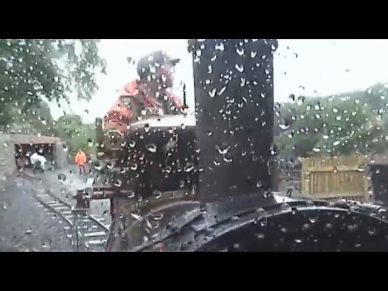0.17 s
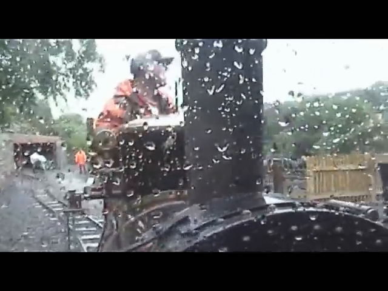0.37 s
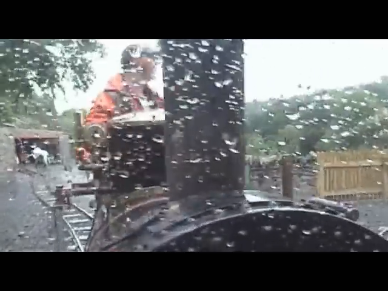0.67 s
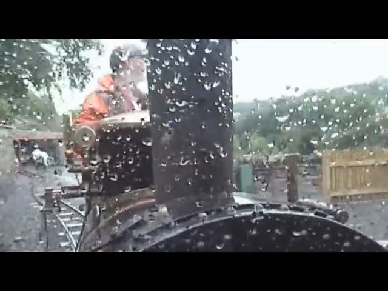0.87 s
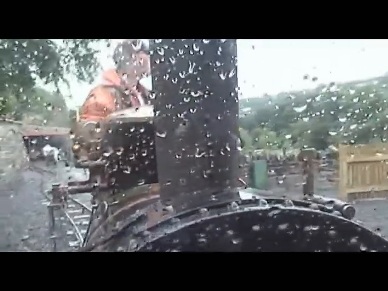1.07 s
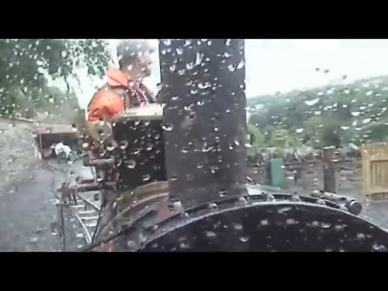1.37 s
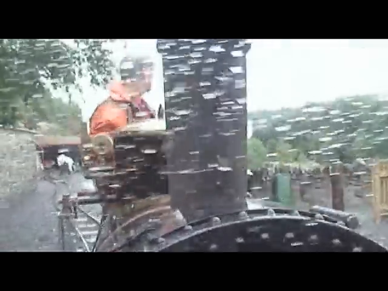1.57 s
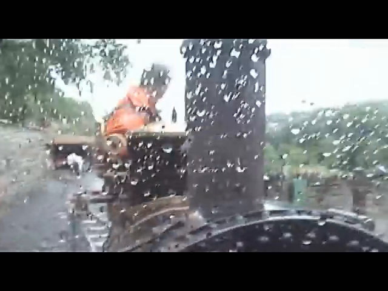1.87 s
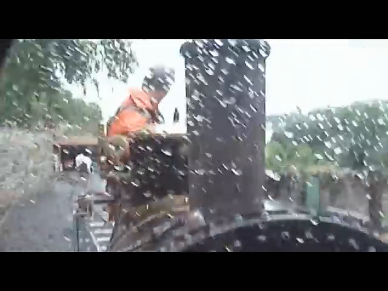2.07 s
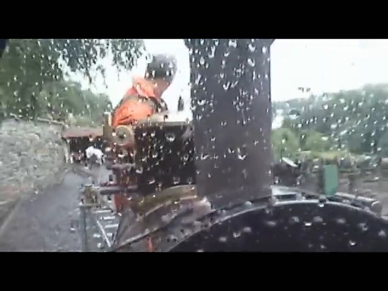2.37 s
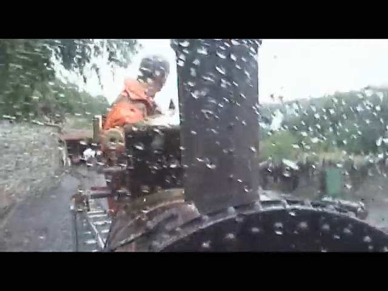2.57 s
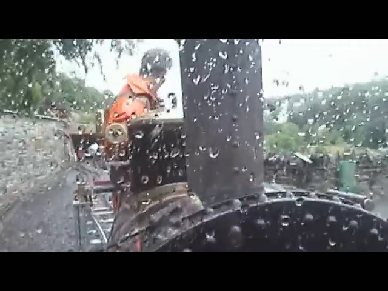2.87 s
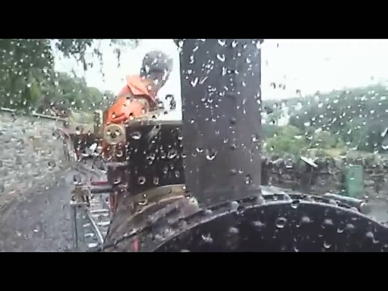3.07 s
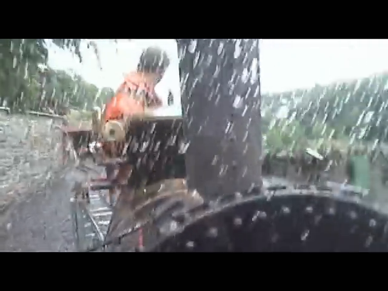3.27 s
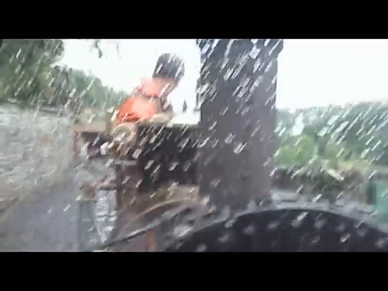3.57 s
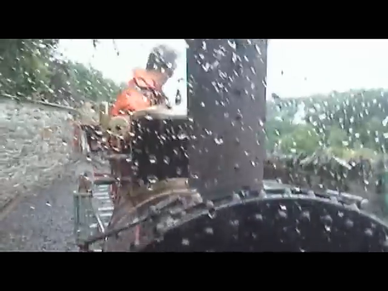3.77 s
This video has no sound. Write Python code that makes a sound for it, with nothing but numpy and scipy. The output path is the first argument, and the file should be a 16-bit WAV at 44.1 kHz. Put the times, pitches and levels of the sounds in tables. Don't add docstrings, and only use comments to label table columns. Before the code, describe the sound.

Low locomotive rumble runs throughout, with dull iron knocks and bright rod clanks in uneven clusters, a buffer slam near the end, and very faint hiss behind. Heard close from the coupled wagon in a walled yard.

```python
import sys
import numpy as np
from scipy import signal
from scipy.fft import rfft, irfft, next_fast_len
from scipy.io import wavfile
from scipy.ndimage import uniform_filter1d

SR = 44100
rng = np.random.default_rng(int(sys.argv[2]) if len(sys.argv) > 2 else 0)


def put_to_file(sound):
    columns = np.atleast_2d(sound).T
    safe = np.clip(columns, -1, 1)
    whole_steps = np.round(safe * 32767)
    wavfile.write(sys.argv[1], SR, whole_steps.astype(np.int16))


def level_to_linear(level):
    exponent = np.asarray(level, float) / 20
    return 10 ** exponent


N = 172431


def evened(x):
    return x / np.sqrt(np.mean(x ** 2) + 1e-20)


def curve(table, axis):
    rows = np.array(table)
    return np.interp(np.arange(N) / SR, rows[:, 0], rows[:, axis])


def add(mix, start_s, sound):
    at = round(start_s * SR)
    part = mix[max(at, 0):][:len(sound) + min(at, 0)]
    part += sound[max(-at, 0):][:len(part)]


def colour(x, spectrum, tilt_db=0.):
    size = next_fast_len(len(x) + 4096)
    hz = np.fft.rfftfreq(size, 1 / SR)
    table_hz, table_db = np.transpose(spectrum)
    db = np.interp(np.log(hz + 1), np.log(table_hz + 1), table_db)
    db += tilt_db * np.log2(hz / 1000 + 1e-3)
    low_cut = np.minimum(hz / spectrum[0][0], 1) ** 4
    return irfft(rfft(x, size) * level_to_linear(db) * low_cut, size)[:len(x)]


def ring(x, hz, width_hz):
    r = np.exp(-np.pi * width_hz / SR)
    poles = [1, -2 * r * np.cos(2 * np.pi * hz / SR), r * r]
    return signal.lfilter([(1 - r * r) / 2, 0, (r * r - 1) / 2], poles, x)


def lumps(size):
    smooth = uniform_filter1d(rng.standard_normal(N), size)
    return evened(uniform_filter1d(smooth, size))


# (time [s], low sway level [dB], rolling level [dB])
WHEEL_EFFORT = [(0, -36, -40), (.35, -37.5, -36.5), (.8, -42, -34), (1.25, -41, -31), (1.6, -35, -29.5),
                (1.85, -31.5, -34.5), (2.1, -32.5, -30.5), (2.35, -36.5, -34), (2.7, -33.5, -35),
                (3.0, -42, -32), (3.3, -32, -29.5), (3.5, -34, -33.5), (3.75, -32, -40), (3.91, -36, -30)]
SWAY_MEAN_DB, ROLL_MEAN_DB = -39, -35
# (frequency [Hz], width [Hz], level [dB])
FRAME_MODES = [(34.4, 12, -47.5), (52.15, 10.7, -41.5), (97, 7.6, -41.5), (132.3, 23, -41),
               (164, 16.7, -39.5), (190, 11.2, -41.5), (220.5, 35.3, -44), (262.7, 19.7, -43),
               (316.3, 17.6, -46.5), (350, 33.5, -51), (473.7, 48, -55.5), (566.3, 25, -58.5),
               (714.5, 17, -63), (980, 18, -75)]


def frame():
    sway_db = curve(WHEEL_EFFORT, axis=1) - SWAY_MEAN_DB
    roll_db = 0.92 * (curve(WHEEL_EFFORT, axis=2) - ROLL_MEAN_DB)
    out = np.zeros(N)
    for hz, width_hz, db in FRAME_MODES:
        driven = ring(rng.standard_normal(N), hz, width_hz)
        mode = evened(ring(driven, hz, 3 * width_hz))
        effort_db = sway_db if hz < 70 else roll_db * min(hz / 200, 1) ** 2
        out += mode * level_to_linear(db + effort_db)
    return out


# (peak time [s], level [dB], frequency [Hz], half length [s])
JOINT_BOOMS = [(.03, -28.5, 164, 0.088), (.25, -27, 162.8, 0.057), (.65, -30.5, 164, 0.15),
               (0.925, -40, 97, 0.027), (1.02, -27.5, 164, 0.078), (1.19, -27.5, 164, 0.14),
               (1.5, -34.5, 190, 0.11), (1.7, -25, 168, 0.032), (2.15, -29.5, 166.6, 0.092),
               (2.53, -28, 164, 0.14), (2.89, -31, 154.6, 0.056), (3.34, -31, 131.4, 0.23),
               (3.4, -35, 167.9, 0.34), (3.5, -35.5, 187, 0.073), (3.84, -26.5, 158, 0.032),
               (0.503, -37, 272.5, 0.064), (1.001, -37, 254.6, 0.19), (1.215, -33.5, 254, 0.14),
               (1.705, -35.5, 246.7, 0.062), (2.05, -35.5, 252.5, 0.2), (1.945, -35.5, 298.3, 0.082),
               (1.322, -32, 56.5, 0.33), (1.453, -38.5, 91, 0.1), (2.6, -34, 97, 0.17)]


def booms():
    out = np.zeros(N)
    for peak_s, db, hz, length_s in JOINT_BOOMS:
        t = np.arange(-length_s, length_s, 1 / SR)
        tone = np.sin(2 * np.pi * (hz * t + rng.random()))
        add(out, peak_s - length_s, level_to_linear(db) * np.sqrt(2) * np.hanning(len(t)) * tone)
    return out


# (frequency [Hz], density [dB per Hz])
RAIL_SPECTRUM = [(15, -29), (25, -10), (171, 7), (325, -6), (425, -13), (1320, -23), (2090, -46.5),
                 (3500, -62), (4550, -93), (7700, -120)]


def rails(jolts):
    rail_db, patch_db = -36.5, 2.
    level_db = rail_db + .5 * (curve(WHEEL_EFFORT, axis=2) - ROLL_MEAN_DB) + 1.49 * jolts
    z = signal.stft(colour(rng.standard_normal(N), RAIL_SPECTRUM), nperseg=1024)[2]
    patches = uniform_filter1d(rng.standard_normal(z.shape), size=6, axis=0)
    patches = evened(uniform_filter1d(patches, size=6, axis=1))
    rolling = signal.istft(z * level_to_linear(patch_db * patches), nperseg=1024)[1][:N]
    return evened(rolling) * level_to_linear(level_db)


def blow(db, t60, rise_s, spectrum, tilt_db, modes):
    t = np.arange(12288) / SR
    grit_db = 2.06 * evened(uniform_filter1d(rng.standard_normal(len(t)), size=90))
    grit = rng.standard_normal(len(t)) * level_to_linear(grit_db)
    envelope = (1 - np.exp(-t / rise_s)) * level_to_linear(-60 * (t / t60) ** 1.186)
    burst = evened(colour(grit, spectrum, tilt_db)) * envelope
    rung = np.zeros(len(t))
    for hz, mode_db, ring_s in modes:
        level_chance, pitch_chance = rng.standard_normal(2)
        width_hz = 2.2 / min(ring_s, .13)
        rung += level_to_linear(mode_db + 1.5 * level_chance) * ring(burst, hz * (1 + 0.007 * pitch_chance), width_hz)
    return level_to_linear(db - 5.5) * (burst + rung)


# (time [s], level [dB], treble tilt [dB per octave], t60 [s])
ROD_CLANKS = [(0.163, -55, 3.5, 0.084), (0.3403, -47.5, 1, 0.1), (0.7241, -38, -3, 0.11),
              (0.893, -43.5, -8.5, 0.2), (1.546, -43.5, -3.5, 0.076), (1.7425, -43, -3, 0.031),
              (1.8199, -45.5, -6, 0.12), (1.9677, -47.5, 6, 0.079), (2.0367, -62.5, 3, 0.18),
              (3.17, -57.5, 3.5, 0.091), (3.5236, -39, -1.5, 0.15), (3.6014, -34, -6.5, 0.1),
              (3.81, -40.5, -3.5, 0.12), (1.76, -53, -2, 0.097), (3.645, -51, -12, 0.12)]
# (frequency [Hz], level over the burst [dB], t60 [s])
ROD_MODES = [(1194, 7.5, 0.03), (2030, 9.5, 0.15), (2240, 13.5, 0.16), (3710, 14, 0.062), (4000, 13, 0.018),
             (5850, 3, 0.046), (6560, 6, 0.024), (7540, -4.5, 0.038)]
# (frequency [Hz], density [dB per Hz])
CLANK_SPECTRUM = [(600, -5.5), (1200, -3.5), (2000, -8.5), (2900, -11.5), (3900, -14), (7800, -13.5),
                  (9500, -21), (11000, -60)]


def rods():
    out = np.zeros(N)
    for s, db, tilt_db, t60 in ROD_CLANKS:
        add(out, s, blow(db, t60, .001, CLANK_SPECTRUM, tilt_db, ROD_MODES))
    return out


# (time [s], level [dB],
# treble tilt [dB per octave], pitch of the struck part [Hz], t60 [s])
IRON_KNOCKS = [(.195, -33.5, -3.5, 1320, 0.13), (.343, -35, -3.5, 970, 0.15),
               (0.358, -27, -4, 610, 0.19), (.374, -30.5, -1, 1370, 0.052), (0.578, -36, 0.5, 1270, .1),
               (.593, -30, 0.5, 1154, 0.11), (.612, -36, -3, 684, 0.37), (0.729, -29.5, -3, 1090, 0.13),
               (.94, -44, -2, 585, 0.24), (1.243, -29, 2, 2400, 0.06), (1.256, -16.5, -9, 936, 0.054),
               (1.279, -42.5, 2.5, 1540, 0.11), (1.295, -40.5, -4.5, 1050, 0.15),
               (1.559, -29.5, -1, 970, 0.044), (1.669, -35, 2.5, 906, 0.083),
               (1.677, -29, 5.5, 1590, 0.069), (1.688, -32.5, 0.5, 1590, 0.074),
               (1.712, -38, 3, 1000, 0.3), (1.728, -32, 1.5, 1590, 0.11), (1.75, -28.5, 1.5, 2450, 0.1),
               (1.885, -34, -3.5, 2170, 0.041), (1.964, -28.5, -4.5, 1016, .09),
               (2.123, -28.5, -3.5, 1360, 0.066), (2.133, -24.5, -4, 1414, 0.046),
               (2.522, -37, -1.5, 1000, 0.18), (2.61, -36.5, -2, 900, 0.35),
               (2.649, -42.5, -0.5, 980, 0.3), (2.681, -39, 0.5, 1730, 0.094),
               (2.695, -31.5, -2, 1060, 0.12), (2.761, -36, -7.5, 607, 0.3),
               (2.802, -37.5, -3.5, 1430, 0.25),
               (3.229, -42, 1.5, 611, .1), (3.257, -26, 3, 1910, 0.1), (3.265, -22, 0, 565, .14),
                (3.27, -27, 4, 2330, .1), (3.279, -26, 1, 958, .12), (3.294, -27, -3, 468, 0.14),
                (3.343, -36, 3, 3300, 0.23), (3.388, -34.5, -1, 1413, 0.27), (3.42, -38, 0, 1400, .2),
                (3.588, -33, -2, 1100, 0.12), (3.622, -34, -1, 960, 0.2), (3.64, -38, 3, 2070, .2),
                (3.527, -38, 2, 1900, .12), (3.815, -36, 0, 1300, .1)]
# (frequency [Hz], level over the burst [dB], t60 [s])
IRON_MODES = [(586, -5, 0.035), (900, -3.5, 0.24), (940, 2.5, .1), (1024, 4.5, 0.089), (1360, 5, 0.11),
              (1590, 7, 0.24), (1917, 6.5, 0.16), (2340, 5, 0.047), (3070, -10, 0.084), (3350, -0.5, 0.09),
              (3760, 5, 0.05), (4720, -4, 0.017), (5200, -1.5, 0.035)]
# (frequency [Hz], density [dB per Hz])
KNOCK_SPECTRUM = [(250, 7.5), (500, 3), (1000, -2.5), (2300, -15), (5000, -28.5), (7500, -42),
                  (9000, -51.5), (11000, -79)]


def coupling():
    out = np.zeros(N)
    for s, db, tilt_db, hz, t60 in IRON_KNOCKS:
        struck_part = (hz, 10, .06)  # Hz, dB, t60 s
        add(out, s, blow(db, t60, .0025, KNOCK_SPECTRUM, tilt_db, IRON_MODES + [struck_part]))
    return out


# (start time [s], length [s], level [dB], slip rate [Hz])
BUFFER_CREAKS = [
    (0.114, .11, -74, 340),
    (2.34, 0.048, -68, 341),
]
# (multiple of slip rate [1], level [dB])
CREAK_HARMONICS = [(3, -27), (4, 17), (5, 16), (7, 0), (10, -7)]


def creaks():
    out = np.zeros(N)
    for s, length_s, db, slip_hz in BUFFER_CREAKS:
        t = np.arange(0, length_s, 1 / SR)
        tone = np.zeros(len(t))
        for multiple, harmonic_db in CREAK_HARMONICS:
            wobble = 1 + 0.47 * np.sin(2 * np.pi * (45 * t + rng.random()))
            tone += level_to_linear(harmonic_db) * wobble * np.sin(2 * np.pi * multiple * slip_hz * t)
        add(out, s, level_to_linear(db) * np.sqrt(np.hanning(len(t))) * tone)
    return out


def in_yard(iron):
    t60, yard_db = 0.22, -12.5
    t = np.arange(SR // 2) / SR
    taps = rng.standard_normal(len(t)) * (rng.random(len(t)) < .05)
    tail = taps * level_to_linear(-60 * t / t60)
    scatter = signal.oaconvolve(iron, tail / np.linalg.norm(tail))[:N]
    return iron + level_to_linear(yard_db) * scatter


# (time [s], level [dB])
STEAM_PRESSURE = [(0, 4), (1.2, 6), (1.38, 8), (1.6, 6.5), (2.2, 2), (2.75, 3), (3.2, 4.5), (3.9, 0.5)]
# (frequency [Hz], density [dB per Hz])
HISS_SPECTRUM = [(1200, -0.5), (1800, -5.5), (2400, -10), (7000, -18), (8300, -25), (10000, -22.5),
                 (11000, -30), (12500, -74.5)]
# (start time [s], length [s], level [dB])
GLAND_PUFF = (1.33, .13, -67)
# (frequency [Hz], density [dB per Hz])
PUFF_SPECTRUM = [(2200, -5), (3000, -6), (4300, 6), (5200, -1), (6500, -14), (8300, -10), (10000, -30.5)]


def steam(jolts):
    level_db = curve(STEAM_PRESSURE, axis=1) + 0.52 * jolts
    out = evened(colour(rng.standard_normal(N), HISS_SPECTRUM)) * level_to_linear(-67.5 + level_db)
    whistle_hz, width_hz, whistle_db = 8150, 1400, -82.5
    sung = ring(ring(rng.standard_normal(N), whistle_hz, width_hz), whistle_hz, width_hz)
    out += evened(sung) * level_to_linear(whistle_db + level_db + 2.0 * lumps(size=3000))
    s, length_s, db = GLAND_PUFF
    breath = evened(colour(rng.standard_normal(8192), PUFF_SPECTRUM))[:round(length_s * SR)]
    add(out, s, level_to_linear(db) * np.sqrt(np.hanning(len(breath))) * breath)
    return out


# (frequency [Hz], density [dB per Hz])
SPRAY_SPECTRUM = [(10000, -18), (10800, 1.5), (11800, -7.5), (12600, -20)]


def spray():
    start_db, fade_db_per_s, gust_db = -87.5, 5.5, 4.5
    level_db = start_db - fade_db_per_s * np.arange(N) / SR + gust_db * lumps(size=1500)
    return evened(colour(rng.standard_normal(N), SPRAY_SPECTRUM)) * level_to_linear(level_db)


# (frequency [Hz], level [dB])
STEREO_WIDTH = [(60, -25), (170, -24), (400, -9.5), (1380, -9), (3940, -7.5), (11200, -7)]


def scene():
    jolts = lumps(size=400)

    def heard():
        bed = frame() + rails(jolts) + steam(jolts) + spray()
        return bed + in_yard(rods() + coupling() + creaks())

    mid = heard()
    side = colour(heard(), STEREO_WIDTH)
    return np.array([mid + side, mid - side]) + booms()


def band_limit(x):
    return signal.sosfilt(signal.butter(12, 12400, fs=SR, output="sos"), x)


def record(dry):
    limit, close_s = .3, .004
    closing = np.minimum(np.arange(N)[::-1] / (close_s * SR), 1)
    return band_limit(limit * np.tanh(dry / limit) * closing)


dry = scene()
out = record(dry)
put_to_file(out)
```